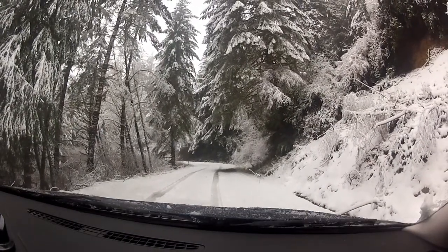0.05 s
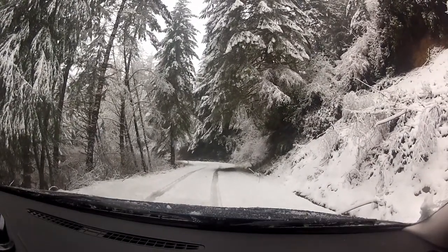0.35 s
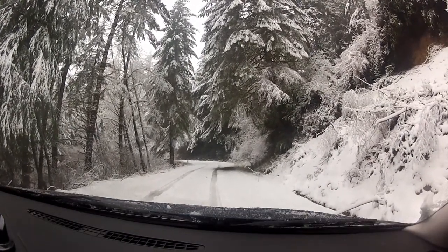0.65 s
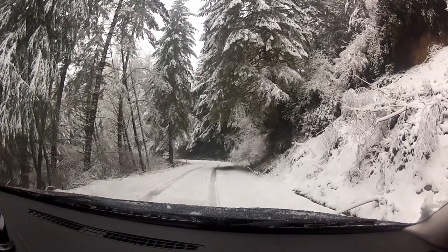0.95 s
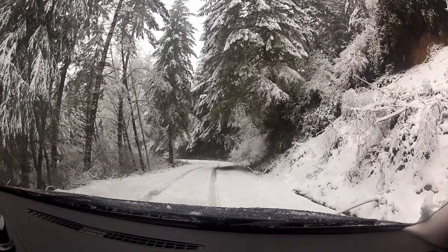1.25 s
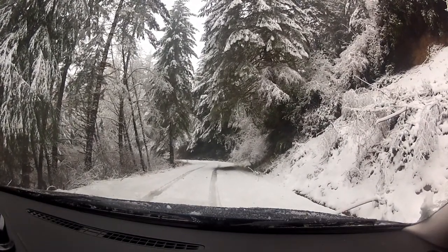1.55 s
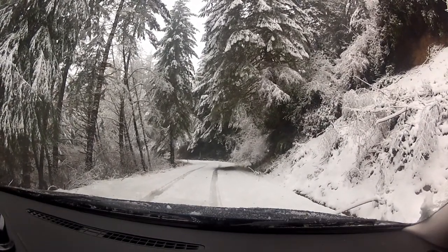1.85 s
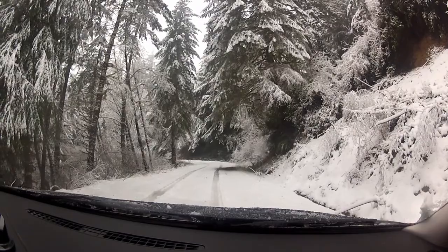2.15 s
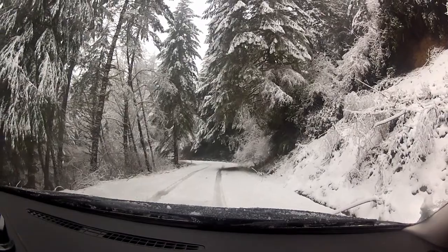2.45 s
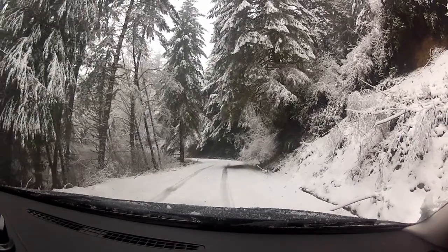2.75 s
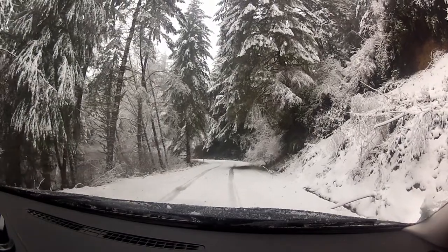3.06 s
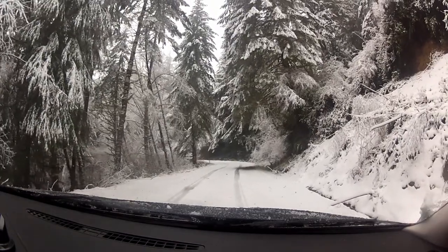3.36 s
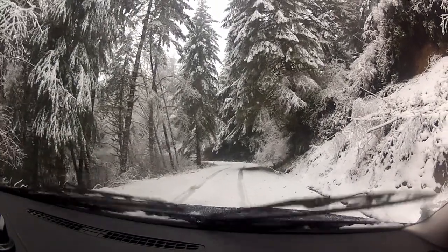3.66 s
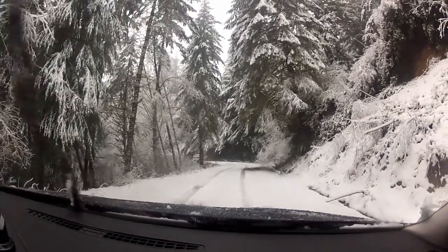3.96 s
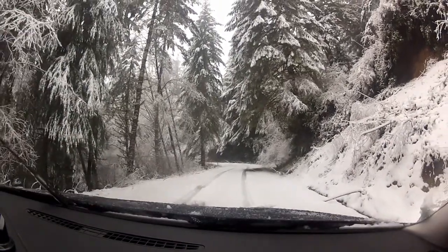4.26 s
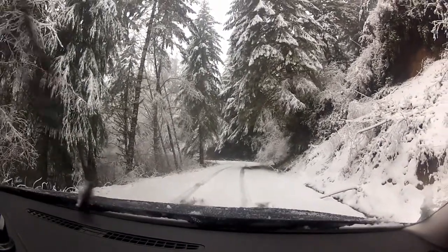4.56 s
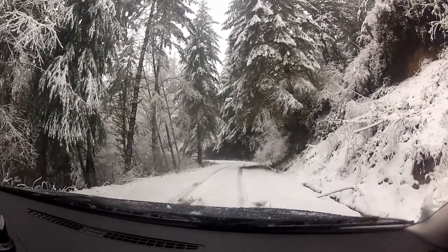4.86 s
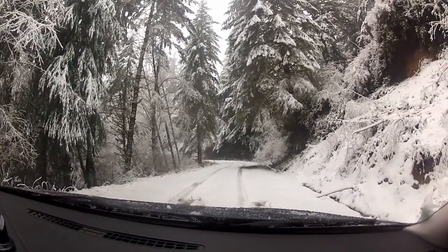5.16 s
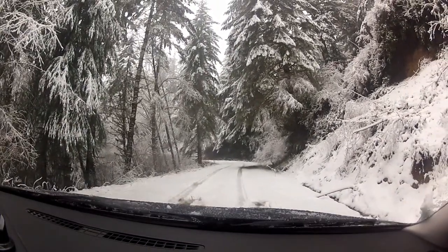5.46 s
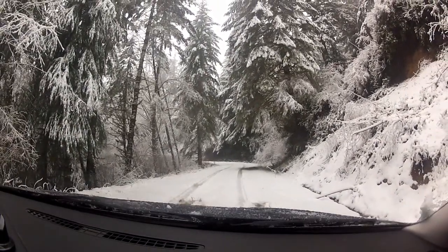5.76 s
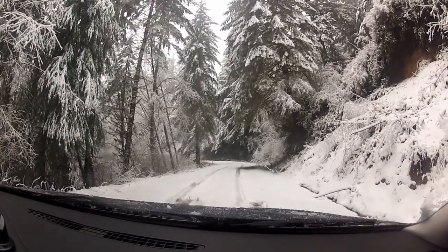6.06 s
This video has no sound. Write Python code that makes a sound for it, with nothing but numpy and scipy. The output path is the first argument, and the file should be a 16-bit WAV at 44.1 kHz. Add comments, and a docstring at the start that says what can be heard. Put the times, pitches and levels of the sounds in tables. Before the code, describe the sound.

Inside a car, the engine swells and sags as tyres slip and rumble over snow, with knocks and one wiper sweep.

```python
"""Slithering up a snowy road

Inside a car, from a dashboard camera's stereo microphones at a low sample rate. The engine swells and sags as
the wheels lose grip, and the cabin booms as the revs climb. Under the floor, tyres rumble and crunch through
snow and slush. Ruts, and the wiper arm as it turns and parks, knock the body and rattle the trim close by on
the right, and the wipers sweep once across the glass just ahead."""
import sys
import numpy as np
from scipy import signal
from scipy.fft import rfft, irfft
from scipy.io import wavfile

SR = 44100
rng = np.random.default_rng(int(sys.argv[2]) if len(sys.argv) > 2 else 0)


def store_wav(level_fs):
    """Save 16-bit WAV to argv[1]."""
    pcm = np.round(np.clip(np.atleast_2d(level_fs), -1, 1) * 32767)
    wavfile.write(sys.argv[1], SR, pcm.T.astype(np.int16))


N = 277830
TIME = np.arange(N) / SR

# snow hissing under the treads (frequency [Hz], gain [dB])
HISS_SPECTRUM = [(350, -1.5), (600, -17), (700, 4), (1040, -1), (1120, -0.5), (1220, -4), (1390, 0),
                 (2390, -11), (2660, -8.5), (3380, -8.5), (3800, -69), (4940, -64), (8360, -120)]
# level of the hiss over time (time [s], level [dB])
HISS_ENVELOPE = [(0, -57.5), (1.25, -60.5), (1.55, -58.5), (2.5, -62), (2.8, -59.5), (4.3, -58.5),
                 (5.15, -59.5), (5.4, -61.5), (5.8, -60), (6.3, -60)]
# slush in the wheel wells (frequency [Hz], gain [dB])
SLUSH_SPECTRUM = [(300, -11.5), (750, 7.5), (1150, -1), (1700, -5.5), (2600, -16.5), (3600, -33.5)]
# faint chirps and tonal taps (time [s], half length [s], pitch [Hz], pitch spread [Hz], level [dB])
FAINT_CHIRPS = [(0.436, 0.0089, 2485, 160, -62), (1.379, 0.0051, 984, 200, -47.5),
                (2.46, 0.019, 3700, 496, -63), (3.25, 0.007, 825, 160.6, -42),
                (6.174, 0.012, 2380, 73, -57)]
# short swells of gritty rasp (time [s], half length [s], level [dB])
RASP_SWELLS = [(2.769, 0.059, -57), (2.945, 0.036, -62), (3.267, 0.021, -49), (3.823, 0.034, -46.5),
               (3.969, 0.016, -43), (4.241, 0.025, -52), (4.74, 0.06, -62), (5.019, 0.033, -55),
               (5.188, 0.034, -59), (6.146, 0.018, -68)]
# the rasp's colour (frequency [Hz], gain [dB])
RASP_SPECTRUM = [(200, -13), (800, 11), (1500, 5), (2700, 2.5), (3600, -1.5), (5000, -16)]
# the wiper arm hitting its frame (time [s], level [dB])
ARM_CLACKS = [(3.823, -24.5), (3.965, -40.5), (4.237, -45), (4.834, -49.5)]
# the arm's modes (frequency [Hz], gain [dB], t60 [s])
ARM_MODES = [(617.4, 4.5, 0.084), (942, -1, 0.065), (1019.4, 0, 0.063), (1200, -1, 0.073),
             (1366, -6.5, 0.05), (1520, -6, 0.061), (2260, -10, 0.04), (2520, 4.5, 0.027),
             (2883, -6, 0.069), (3210, -12.5, 0.091)]
# a loose plastic fitting tapping the dashboard (time [s], level [dB])
PLASTIC_TAPS = [(0.5965, -32), (0.6145, -44)]
# the fitting's modes (frequency [Hz], gain [dB], t60 [s])
PLASTIC_MODES = [(1070, -8, 0.11), (1600, -12, 0.12), (1783, -7, 0.063), (2300, -0.5, 0.049),
                 (2400, -2, 0.05), (3040, -12, 0.082), (3360, -8, 0.046)]
# dashboard trim resonances (frequency [Hz], bandwidth [Hz], gain [dB])
TRIM_RESONANCES = [(617, 37, 7.5), (805, 160, -5.5), (1023, 23, -4.5), (1164, 100, -5.5), (1415, 180, -2.5),
                   (1830, 42, -4.5), (2275, 550, -6), (2830, 29, -1.5)]
# body and cabin modes (frequency [Hz], gain [dB], t60 [s])
BODY_MODES = [(61.5, 16, 0.085), (125.3, 11.5, 0.11), (172, 4.5, 0.078), (214.6, 3, 0.097),
              (287.5, 6.5, 0.11), (353.6, 1.5, 0.14), (413, 4, 0.067), (478, -6, 0.099), (621, -29.5, 0.19)]
# knocks on the body, from ruts and from the wiper arm as it turns and parks (time [s], thump peak [dB], centre
# [Hz], width [octaves], tuning [ratio], # thump delay [s], contact over thump [dB], rattle level [dB], rattle
# decay [s], rattle cutoff [Hz])
BODY_KNOCKS = [(0.4342, -4, 179.5, 0.62, 0.94, 0.00038, -21.5, -16.5, 0.0043, 1690),
               (0.445, -12, 218, 0.42, 1.01, 0.0014, -28, -49, 0.007, 1290),
               (0.595, -10, 153, 0.32, 1.05, 0.00044, -15.5, -7.5, 0.0017, 4220),
               (0.613, -9.5, 226, 1.17, 0.94, 0.0025, -6.5, -25.5, 0.012, 3020),
               (0.617, -14, 71, 0.5, 1.08, 0.014, -32, -44, 0.0096, 3000),
               (1.373, -34, 130, 1.3, 1.08, 0.014, -6, -36, 0.0029, 2360),
               (1.551, -54, 150, 1.1, 1.5, 0.016, -8, -41.5, 0.014, 3530),
               (1.617, -50, 150, 1, 0.73, 0.01, -8, -39, 0.0054, 3900),
               (1.737, -14, 187, 0.57, 0.97, 0.00037, -10.5, -38.5, 0.0081, 2510),
               (1.751, -19.5, 290, 0.68, 1.02, 0.00069, -18, -52, 0.006, 2000),
               (2.169, -34, 150, 1.3, 0.75, 0.01, -15, -43, 0.0083, 3970),
               (3.249, -19, 196, 0.87, 0.91, 0.0096, -11, -30, 0.0063, 1100),
               (3.261, -19.5, 150.7, 0.79, 1.12, 0.0109, -19, -40, 0.036, 3950),
               (3.8215, -2, 167, 0.57, 0.98, 0.00037, -8.5, -20, 0.014, 4200),
               (3.957, -18.5, 222, 0.72, 1.3, 0.0064, -14.5, -21, 0.0098, 1390),
               (4.233, -17.5, 175, 0.71, 0.97, 0.0077, -9.5, -25.5, 0.01, 2680),
               (4.304, -45, 120, 0.9, 0.81, 0.013, 4, -43.5, 0.02, 4070),
               (4.532, -31.5, 201, 0.51, 1.17, 0.01283, -10, -40, 0.015, 4030),
               (4.559, -28, 214, 0.52, 1.1, 0.0121, -9, -39.5, 0.0068, 4000),
               (4.831, -27.5, 120, 0.63, 1.15, 0.0152, -15, -29.5, 0.0085, 3730),
               (5.75, -51, 198, 0.97, 1.1, 0.0094, -1, -39, 0.01, 3997),
               (6.223, -16.5, 157.5, 0.9, 0.87, 0.0037, -11.5, -41.5, 0.039, 2600)]
# low, dull thumps with no rattle of their own (time [s], peak [dB], centre [Hz])
DULL_THUMPS = [(0.434, -14.5, 50), (1.921, -20, 65), (2.164, -20, 90), (3.913, -19.5, 95.8),
               (3.948, -16.5, 92), (3.997, -17.5, 96), (4.922, -19.5, 84.4), (5.028, -20, 89),
               (6.255, -17.5, 131)]
# the suspension heaving through a rut (time [s], length [s], frequency [Hz], peak [dB])
RUT_HEAVE = (3.905, .13, 30, -17)
# lumpiness of the snow under the tyres (time [s], level [dB])
ROAD_ROUGHNESS = [(0, -5), (.6, 2.5), (1.1, 0), (1.6, 0.5), (2, 2.5), (2.4, -14.5), (2.85, 1), (3.4, 3),
                  (3.95, 7.5), (4.3, 3.5), (4.65, 0.5), (5, 4), (5.22, -1.5), (5.45, 2), (6.05, 8),
                  (6.3, 13.5)]
# the body shaking (frequency [Hz], gain [dB])
SHAKE_SPECTRUM = [(10, -3), (22, 10), (32, 12.5), (55, 5), (80, 7), (110, 9), (140, 3.5), (200, -37.5),
                  (400, -66)]
# road roar through the cabin's air resonances (frequency [Hz], gain [dB])
ROAR_SPECTRUM = [(70, -0.5), (150, 0), (183, 3), (228, 5.5), (272, -9), (320, -9.5), (378, -4), (408, -14),
                 (444, -4), (485, -13.5), (515, -18.5), (590, -16.5), (680, -33.5), (1200, -64.5)]
# engine speed, rising each time the wheels break loose (time [s], firing rate [Hz])
FIRING_RATE = [(0, 43.73), (1.2, 32.31), (1.5, 64.9), (1.8, 55.96), (2.12, 30.86), (2.32, 27.56),
               (2.7, 53.93), (3.15, 57.5), (3.42, 28.15), (3.69, 46.86), (3.95, 33.03), (4.3, 49.35),
               (4.6, 30), (5.21, 34.9), (5.33, 49.8), (5.52, 57.42), (5.79, 92), (5.98, 95), (6.08, 106.2),
               (6.18, 91.35), (6.3, 91.8)]
# engine orders (multiple of the firing rate [ratio], level [dB])
ENGINE_ORDERS = [(.5, -18.5), (1, 1), (1.5, -15.5), (2, -8.5), (2.5, -20), (3, -25), (4, -30.5), (6, -25.5)]
# the cabin booms with some orders and muffles the high ones (frequency [Hz], gain [dB])
CABIN_RESPONSE = [(60, -2.5), (100, 1), (145, -9), (188, 5), (218, 6), (270, -5), (380, -17), (600, -41)]
# the boom surges as a spin starts and throbs at high revs (time [s], half length [s], boost [dB])
BOOM_SURGES = [(1.347, 0.048, 7), (2.497, 0.066, 5.5), (3.502, 0.033, 9.5), (3.674, 0.023, 4),
               (5.34, 0.081, 5.5), (6.077, 0.039, 10.5), (6.2, 0.024, 20.5), (6.295, 0.043, 22.5)]
# the driver easing off (time [s], half length [s])
THROTTLE_LIFTS = [(3.153, 0.32), (4.806, 0.26)]
# how much the two microphones differ (frequency [Hz], side gain [dB])
MIC_DIFFERENCE = [(60, -78.5), (110, -70), (190, -62), (330, -42), (590, -25.5), (1030, -31), (1830, -21.5),
                  (3230, -16.5)]
# the right channel's slightly brighter treble (frequency [Hz], side over mid [dB])
RIGHT_TREBLE = [(3000, -75.5), (4500, -32), (10000, -29)]


def from_db(db):
    """Decibels to gain."""
    return 10 ** (np.asarray(db) / 20)


def unit(x):
    """Scales to rms 1."""
    return x / np.sqrt(np.mean(x ** 2) + 1e-20)


def curve(rows):
    """Joins rows of (time [s], value) by straight lines."""
    return np.interp(TIME, *np.transpose(rows))


def hump(s, half_s):
    """A smooth rise and fall of height 1 around s seconds."""
    return np.exp(-((TIME - s) / half_s) ** 2)


def colour(x, points):
    """Filters by a spectrum of (frequency [Hz], gain [dB]) points."""
    hz, db = np.transpose(points)
    gain_db = np.interp(np.log(np.fft.rfftfreq(N, 1 / SR) + 1), np.log(hz + 1), db)
    return irfft(rfft(x) * from_db(gain_db), N)


def wander(rate_hz):
    """Random drift of rms 1, up to about the given rate."""
    hz = np.fft.rfftfreq(N, 1 / SR)
    return unit(irfft(rfft(rng.standard_normal(N)) / (1 + (hz / rate_hz) ** 4), N))


def grit(grains_per_s, spread_db):
    """Tiny clicks of random size and sign, rms 1."""
    sizes = from_db(spread_db * np.minimum(rng.exponential(1, N), 4)) * rng.choice([-1, 1], N)
    return unit(sizes * (rng.random(N) < grains_per_s / SR))


def add(mix, s, sound):
    """Mixes a sound in at s seconds."""
    part = mix[max(round(s * SR), 0):][:len(sound)]
    part += sound[:len(part)]


def trim(x):
    """Rings the plastic dashboard under the microphones."""
    return sum(from_db(db) * signal.lfilter(*signal.iirpeak(hz, hz / width, SR), x)
               for hz, width, db in TRIM_RESONANCES)


def snow(hiss_db=1, crumbs_db=-8, flicker_db=1, clumps_db=3.5):
    """Outside, snow hisses under the treads, and clumps of thrown crumbs tick through the panels."""
    hiss = unit(colour(rng.standard_normal(N), HISS_SPECTRUM))
    hiss *= from_db(hiss_db + flicker_db * wander(rate_hz=16))
    thrown = grit(grains_per_s=200, spread_db=1.5) * from_db(clumps_db * wander(rate_hz=6))
    crumbs = unit(trim(thrown)) * from_db(crumbs_db)
    return (hiss + crumbs) * from_db(curve(HISS_ENVELOPE))


def slush(level_db=-59.5, at_firing_hz=95, db_per_octave=10.5, clumps_db=2):
    """Treads fling wet clumps at the wheel wells: a dull churn, louder the faster they spin."""
    churn = unit(colour(grit(grains_per_s=1500, spread_db=0.5), SLUSH_SPECTRUM))
    spin_db = db_per_octave * np.log2(curve(FIRING_RATE) / at_firing_hz)
    return churn * from_db(level_db + spin_db + clumps_db * wander(rate_hz=12))


def chirps():
    """Brief, faint chirps and tonal taps, each one unsteady tone."""
    waver = wander(rate_hz=160)
    out = np.zeros(N)
    for s, half_s, hz, spread_hz, db in FAINT_CHIRPS:
        cycles = np.cumsum(hz + spread_hz / 2 * waver) / SR
        out += from_db(db) * hump(s, half_s) * np.sin(2 * np.pi * cycles)
    return np.sqrt(2) * out


def rasps():
    """Short swells of gritty rasp, one surrounding the loudest knock."""
    rasp = unit(colour(grit(grains_per_s=2800, spread_db=-3.5), RASP_SPECTRUM))
    return rasp * sum(from_db(db) * hump(s, half_s) for s, half_s, db in RASP_SWELLS)


def wipers(start_s=3.48, turn_s=4.1, park_s=5.18, level_db=-58.5, judder_db=3.5):
    """Just ahead, rubber judders over gritty wet glass, out and back, loudest at mid-stroke."""
    strokes = np.interp(TIME, [start_s, turn_s, park_s], [0, 1, 2])
    speed = abs(np.sin(np.pi * strokes))
    rubber_spectrum = [(200, 21), (600, 19.5), (1400, -2), (2400, 5), (3500, 2), (5000, -25)]
    rub = unit(colour(grit(grains_per_s=3100, spread_db=1.5), rubber_spectrum))
    return from_db(level_db + judder_db * wander(rate_hz=23)) * speed * rub


def clacks(hits, modes, rise_s):
    """A stiff part near the microphones rings briefly after each hard hit."""
    t = np.arange(SR // 4) / SR
    ring = sum(from_db(db - 60 * t / t60) * np.sin(2 * np.pi * hz * t) for hz, db, t60 in modes)
    ring *= 1 - np.exp(-t / rise_s)
    out = np.zeros(N)
    for s, db in hits:
        add(out, s, from_db(db) * ring)
    return out


def rattles(gain_db=3.5, crack_db=-15, tail_db=-14.5, tail_s=0.05, rise_cycles=7):
    """Loose trim chatters close by after each knock; the small cabin adds a short tail."""
    t = np.arange(SR // 4) / SR
    chatter = np.zeros(N)
    for s, *_, db, decay_s, cutoff_hz in BODY_KNOCKS:
        noise = signal.lfilter(*signal.butter(4, cutoff_hz, fs=SR), rng.standard_normal(len(t)))
        rise = 1 - np.exp(-t * cutoff_hz / rise_cycles)  # dull rattles swell more slowly
        tail = from_db(tail_db) * np.sqrt(decay_s / tail_s) * np.exp(-t / tail_s)
        add(chatter, s, from_db(db) * noise * rise * (np.exp(-t / decay_s) + tail))
    return from_db(gain_db) * (trim(chatter) + from_db(crack_db) * chatter)


def blow(peak_db, centre_hz, octaves=1, tuning=1, rise_s=0.0031, near=False):
    """A blow rings the body's modes, most strongly near its centre pitch; each spot has its own tuning."""
    t = np.arange(SR // 4) / SR
    hz, db, t60 = np.transpose(BODY_MODES)[:, :, None]
    # far from the blow, neighbouring modes swing opposite ways
    sign = 1 if near else (-1) ** np.arange(len(BODY_MODES))[:, None]
    weight = 1 / (1 + (np.log2(hz / centre_hz) / octaves) ** 2) ** 2
    modes = from_db(db - 60 * t / t60) * np.sin(2 * np.pi * tuning * hz * t)
    ring = (sign * weight * modes).sum(0) * (1 - np.exp(-t / rise_s))
    return from_db(peak_db) * ring / abs(ring).max()


def thumps(contact_pitch_ratio=3.4):
    """Knocks strike the body twice, a quick contact and then the weight; dull thumps ring it once."""
    out = np.zeros(N)
    for s, peak_db, centre_hz, octaves, tuning, delay_s, contact_db, *_ in BODY_KNOCKS:
        contact_hz = centre_hz * contact_pitch_ratio
        add(out, s, blow(peak_db + contact_db, contact_hz, tuning=tuning, rise_s=0.0015, near=True))
        add(out, s + delay_s, blow(peak_db, centre_hz, octaves, tuning))
    for s, peak_db, centre_hz in DULL_THUMPS:
        add(out, s, blow(peak_db, centre_hz))
    return out


def suspension():
    """The body swings a few times on its springs."""
    s, length_s, hz, db = RUT_HEAVE
    t = np.arange(round(length_s * SR)) / SR
    out = np.zeros(N)
    add(out, s, from_db(db) * np.sin(2 * np.pi * hz * t) * signal.windows.tukey(len(t), 0.3))
    return out


def tyres(shake_db=-36.5, roar_db=-36, flutter_db=0.9):
    """Under the floor, lumpy packed snow shakes the body and roars more evenly in the wheel wells."""
    road_db = curve(ROAD_ROUGHNESS)
    lumps_db = flutter_db * wander(rate_hz=18)
    shake = unit(colour(rng.standard_normal(N), SHAKE_SPECTRUM))
    roar = unit(colour(rng.standard_normal(N), ROAR_SPECTRUM))
    return (shake * from_db(shake_db + road_db + lumps_db)
            + roar * from_db(roar_db + 0.17 * road_db + 0.36 * lumps_db))


def engine_gain(coast_db=-36, pull_db=3, full_pull_octaves_per_s=0.83, lag_s=0.022,
                drone_db=4, drone_hz=51.1, drone_octaves=0.26, lift_db=-12):
    """The engine is louder as it speeds up or meets a low resonance, softer as the throttle is eased."""
    firing_hz = curve(FIRING_RATE)
    octaves_per_s = np.gradient(np.log2(firing_hz)) * SR
    climb = np.clip(octaves_per_s / full_pull_octaves_per_s, 0, 1)
    pole = np.exp(-1 / (lag_s * SR))
    pull = signal.lfilter([1 - pole], [1, -pole], climb)
    drone = np.exp(-(np.log2(firing_hz / drone_hz) / drone_octaves) ** 2)
    lift = sum(hump(s, half_s) for s, half_s in THROTTLE_LIFTS)
    return from_db(coast_db + pull_db * pull + drone_db * drone + lift_db * lift)


def engine(jitter=0.0077, uneven_db=0.5, other_orders_share=0.37):
    """Engine orders sweep through the cabin's resonances; surges swell mainly the firing note."""
    firing_hz = curve(FIRING_RATE) * (1 + jitter * wander(rate_hz=10.1))
    firings = np.cumsum(firing_hz) / SR
    surge = sum((from_db(db) - 1) * hump(s, half_s) for s, half_s, db in BOOM_SURGES)
    surge_db = 20 * np.log10(1 + surge)
    out = np.zeros(N)
    for multiple, db in ENGINE_ORDERS:
        cabin_db = np.interp(multiple * firing_hz, *np.transpose(CABIN_RESPONSE))
        share = 1 if multiple == 1 else other_orders_share
        gain = from_db(db + cabin_db + share * surge_db + uneven_db * wander(rate_hz=16))
        out += gain * np.sin(2 * np.pi * (multiple * firings + rng.random()))
    return np.sqrt(2) * engine_gain() * out


def scene(off_centre_db=9):
    """At the microphone pair on the dashboard, the bass is central and the knocks come from the right."""
    driving = engine() + tyres() + snow() + slush() + suspension() + wipers() + rasps() + chirps()
    wiper_arm = clacks(ARM_CLACKS, ARM_MODES, rise_s=0.0042)
    loose_fitting = clacks(PLASTIC_TAPS, PLASTIC_MODES, rise_s=0.00052)
    knocks = thumps() + rattles() + wiper_arm + loose_fitting
    mid = driving + knocks
    off_centre = driving + from_db(off_centre_db) * colour(knocks, [(500, -1.5), (1000, 3), (2500, -10.5)])
    # the microphones differ in both level and phase
    quarter_turn = signal.hilbert(off_centre).imag
    side = colour(off_centre + quarter_turn, MIC_DIFFERENCE) / np.sqrt(2)
    return np.array([mid - side, mid + side])


def record(dry, sample_hz=8000, anti_alias_hz=3780, top_hz=10600):
    """The camera's slow converter holds each sample, mirroring the sound as a thin fizz about its rate."""
    faded = dry * signal.windows.tukey(N, 0.004)
    anti_alias = signal.firwin(801, anti_alias_hz, fs=SR)
    dulled = signal.oaconvolve(faded, anti_alias[None], "same")
    slow = signal.resample(dulled, round(N * sample_hz / SR), axis=1)
    held = signal.resample(np.repeat(slow, 5, axis=1), N, axis=1)
    held += np.outer([-1, 1], colour(held.mean(0), RIGHT_TREBLE))
    top_cut = signal.firwin(1023, top_hz, window=("kaiser", 9), fs=SR)
    return signal.oaconvolve(held, top_cut[None], "same")


dry = scene()
out = record(dry)
store_wav(out)
```